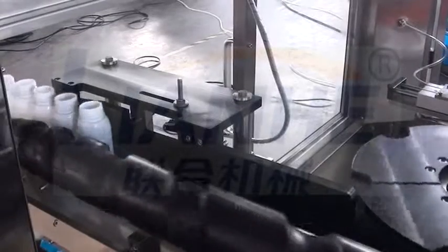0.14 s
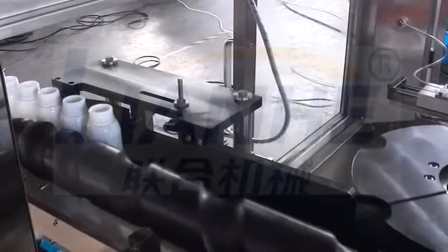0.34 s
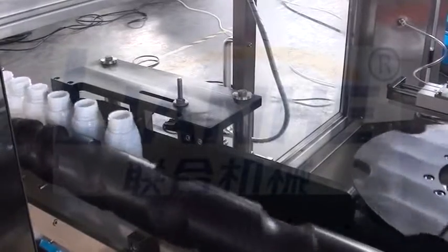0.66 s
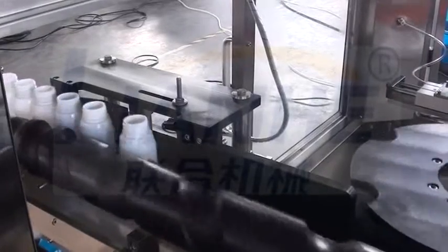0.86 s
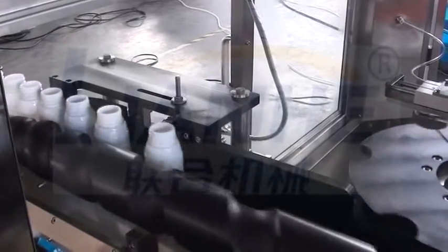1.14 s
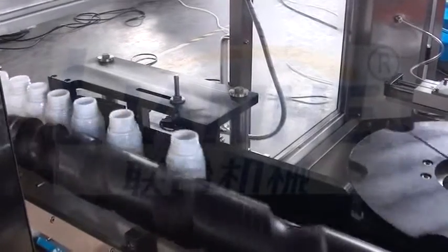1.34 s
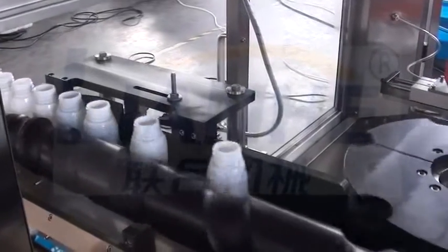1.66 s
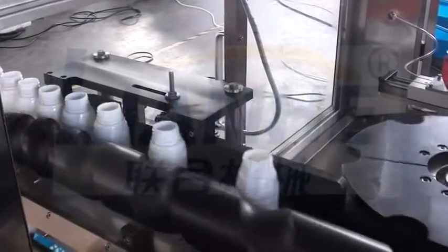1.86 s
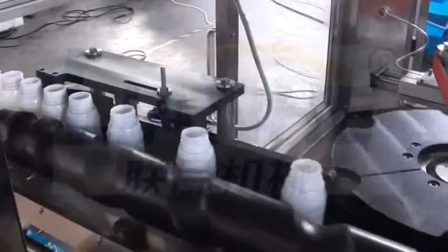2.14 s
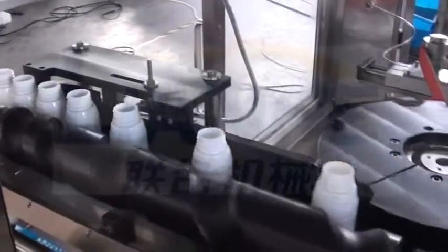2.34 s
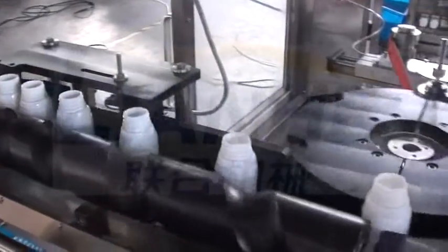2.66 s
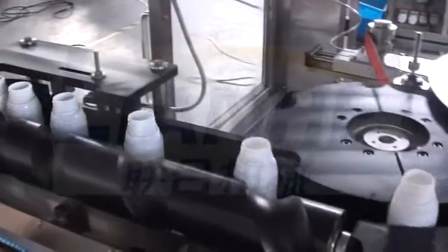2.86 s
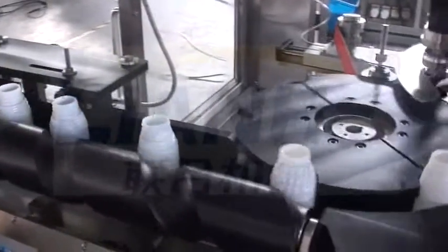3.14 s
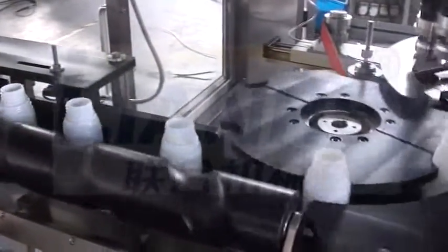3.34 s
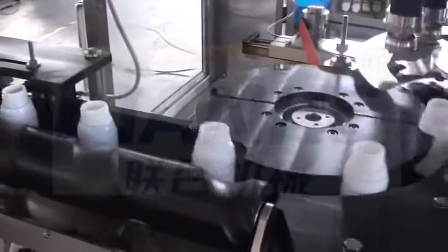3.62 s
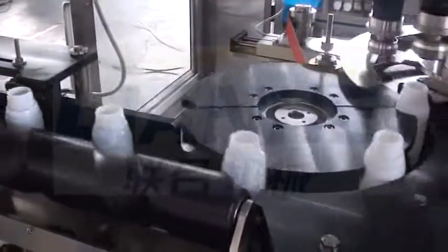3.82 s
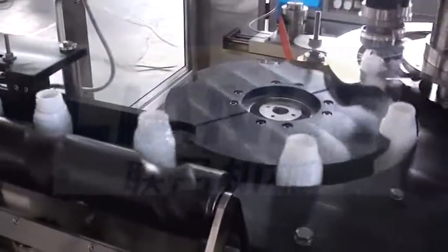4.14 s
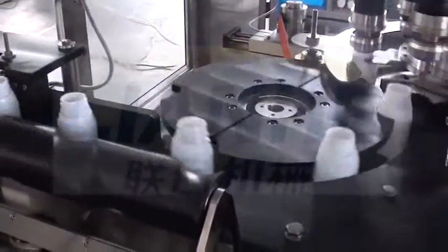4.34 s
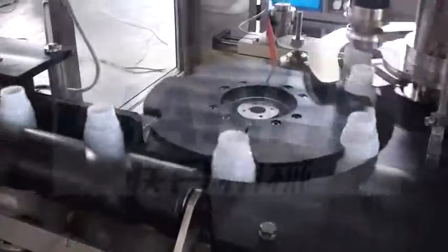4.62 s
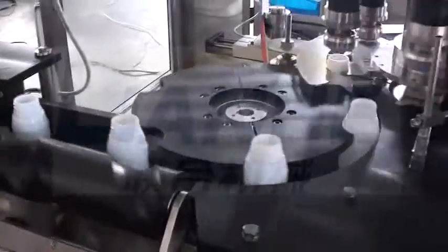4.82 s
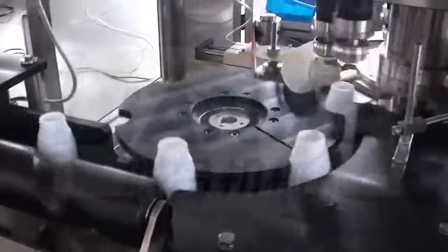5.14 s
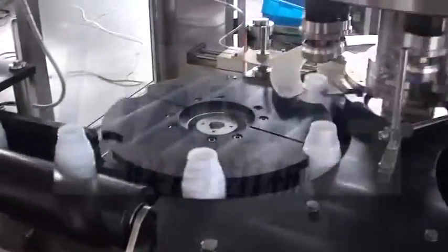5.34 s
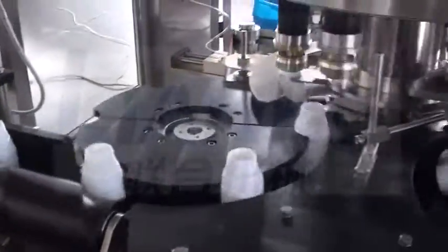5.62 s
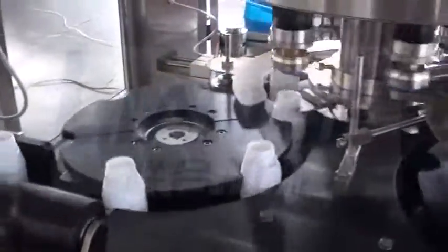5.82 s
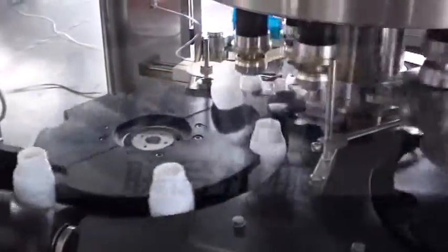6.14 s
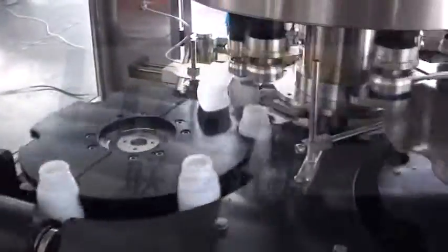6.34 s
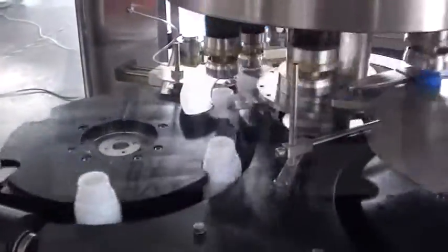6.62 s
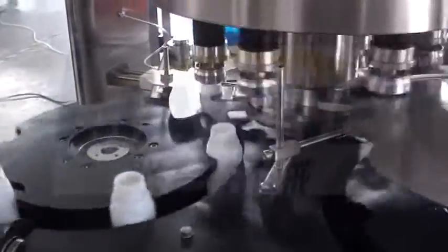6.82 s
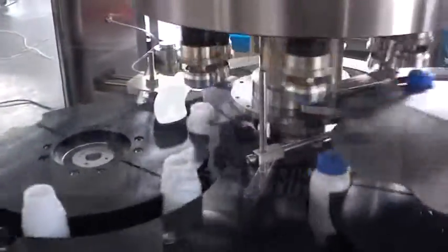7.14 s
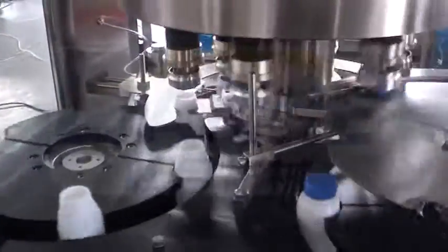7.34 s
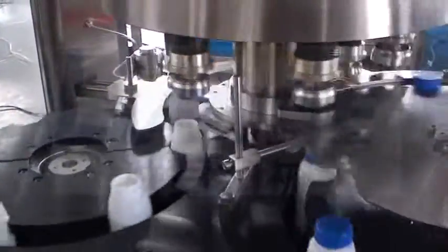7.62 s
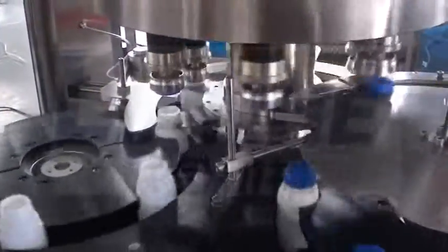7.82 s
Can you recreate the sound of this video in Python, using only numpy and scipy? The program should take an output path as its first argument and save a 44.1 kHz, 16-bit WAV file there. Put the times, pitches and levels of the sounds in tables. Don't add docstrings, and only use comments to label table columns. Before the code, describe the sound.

Rhythmic pneumatic clack-and-psst cycles over a broad machine roar, with ringing bottle ticks, steel snaps and brief rubber squeaks near the end.

```python
import sys
import numpy as np
from scipy import signal
from scipy.fft import rfft, irfft, next_fast_len
from scipy.io import wavfile
from scipy.ndimage import uniform_filter1d, map_coordinates

SR = 44100
rng = np.random.default_rng(int(sys.argv[2]) if len(sys.argv) > 2 else 0)


def to_wav(sig):
    pcm = np.clip(np.atleast_2d(sig), -1, 1) * 32767
    pcm = np.round(pcm).astype(np.int16)
    wavfile.write(sys.argv[1], SR, pcm.T)


def boost(x):
    u = np.asarray(x, float) / 20
    return 10 ** u


N = 351477
TIME = np.arange(N) / SR


def unit(x):
    return x / np.sqrt(np.mean(x ** 2) + 1e-20)


def along(points, hz):
    f, v = np.transpose(points)
    return np.interp(np.log(hz + 1), np.log(f + 1), v)


def wobble(rate):
    return map_coordinates(rng.standard_normal(int(N * rate / SR) + 4), [TIME * rate])


def filtered(x, response):
    m = next_fast_len(N + 8192)
    return irfft(rfft(x, m) * response(np.fft.rfftfreq(m, 1 / SR)), m)[..., :N]


def rush(spectrum, peaks, patchy_db):
    z = signal.stft(rng.standard_normal(N), nperseg=512)[2]
    field = uniform_filter1d(rng.standard_normal(z.shape), size=2, axis=0)
    field = uniform_filter1d(field, size=10, axis=1)
    x = signal.istft(z * boost(patchy_db * unit(field)), nperseg=512)[1][:N]

    def response(hz):
        bumps = sum(db / (1 + (2 * (hz - center) / width) ** 2) for center, width, db in peaks)
        return boost(along(spectrum, hz) + bumps)

    return unit(filtered(x, response))


def burst(start, rise, hold, fade_db):
    t = TIME - start
    return np.clip(t / rise, 0, 1) * boost(-fade_db * np.clip(t - hold, 0, 1))


# (frequency [Hz], t60 [s])
HALL_T60 = [(200, 0.83), (2000, 0.94), (8000, 0.043)]


def hall(x):
    hz, t, z = signal.stft(rng.standard_normal(SR // 2), SR, nperseg=256)
    decay = boost(-60 * t / along(HALL_T60, hz)[:, None])
    tail = signal.istft(z * decay, SR, nperseg=256)[1]
    return signal.fftconvolve(x, tail / np.linalg.norm(tail))[:N]


# (time [s], level [dB])
ROAR_LEVEL = [(0, -29), (2.6, -29.5), (3.4, -28), (3.9, -29.3), (4.2, -27.5), (4.5, -28), (5.8, -29),
              (6.0, -27.5), (7.97, -27)]
# (frequency [Hz], density [dB per Hz])
ROAR_SPECTRUM = [(15, -65), (25, -38.5), (74, -15), (119, -8), (152, -10), (228, -9.5), (416, -8),
                 (469, -11), (626, -7), (740, -7), (1040, -8.5), (1680, -11), (3700, -15), (5850, -23),
                 (7800, -24.5), (10100, -49), (17200, -120)]
# (frequency [Hz], width [Hz], height over the roar [dB])
FRAME_MODES = [(165, 25, 6), (315, 160, 4), (618, 49, 5.5), (1002, 80, 2.5), (4330, 1000, 3),
               (5030, 780, -1), (6000, 900, 2)]
# (time [s], level [dB])
CHUCK_LEAK = [(0, -27.5), (.3, -37), (1.4, -34), (2.2, -36.5), (4.2, -35), (6.2, -31.5), (6.7, -37.5),
              (7.05, -27), (7.97, -23)]
# (frequency [Hz], density [dB per Hz])
LEAK_SPECTRUM = [(3000, -22), (4800, -6.5), (6000, -4.5), (7000, 0.5), (9000, -8.5), (14000, -10.5)]
# (frequency [Hz], level [dB])
MOTOR_HUM = [(150.7, -41), (640.6, -49.5)]


def machine():
    roar_db = np.interp(TIME, *np.transpose(ROAR_LEVEL)) + 1.5 + 1.0 * wobble(12)
    roar = boost(roar_db) * rush(ROAR_SPECTRUM, FRAME_MODES, patchy_db=1.26)
    leak_db = np.interp(TIME, *np.transpose(CHUCK_LEAK)) + .8 * wobble(20)
    leak = boost(leak_db) * rush(LEAK_SPECTRUM, [], patchy_db=.9)
    hum = np.zeros(N)
    for hz, db in MOTOR_HUM:
        phase = 2 * np.pi * np.cumsum(hz + 2.836 * wobble(12)) / SR
        hum += boost(db + 2 + 2.5 * wobble(8.3)) * np.sin(phase)
    return roar + leak + hum


# (time [s], peak [dB], open time [s], body [dB])
FAR_VENTS = [(0.0394, -36.5, 0.06, -16), (3.218, -22.5, 0.049, -1), (4.0741, -14.5, 0.09, -1.5),
             (5.819, -20.5, 0.03, -1.5), (6.419, -20, 0.039, -10.5), (6.6846, -10.5, 0.017, -7.5),
             (6.9294, -20.5, 0.043, -5), (7.5572, -20, 0.042, -4.5)]
# (time [s], length [s], frequency [Hz], level [dB])
EDGE_WHISTLES = [(.595, .045, 4450, -30), (4.12, .09, 2306, -35.5), (4.135, .05, 1930, -37),
                 (4.14, .04, 3050, -35), (6.695, .04, 2650, -35), (6.92, .15, 2306, -35.5),
                 (6.93, .12, 1566, -38), (6.93, .1, 3154, -39)]
VENT_FADE_DB_PER_S = 111.5


def air():
    far = [boost(db - 9) * burst(s, .01, hold, VENT_FADE_DB_PER_S) for s, db, hold, _ in FAR_VENTS]
    body = sum(flow * boost(row[3]) for flow, row in zip(far, FAR_VENTS))
    body_spectrum = [(800, -15), (1600, 1.5), (2300, -1.5), (3200, 3), (4500, -4.5), (7000, -15.5)]
    out = sum(far) * rush(LEAK_SPECTRUM, [], patchy_db=0.5)
    out = out + body * rush(body_spectrum, [], patchy_db=1.2)
    for s, span, hz, db in EDGE_WHISTLES:
        hoarse = 0.9 + 0.44 * wobble(90)
        out += boost(db + 5.0) * burst(s, 0.0092, span, 400) * hoarse * np.sin(2 * np.pi * hz * TIME)
    return out


# (time [s], length [s], first frequency [Hz], last frequency [Hz], peak [dB])
CHUCK_SQUEAKS = [(7.276, .017, 6720, 6660, -16), (7.35, .052, 5420, 5780, -16.5),
                 (7.608, .108, 5580, 5340, -21), (7.707, .066, 6780, 7130, -6.5)]
GRIP_LOSS = [10, 10, 4, 19]
GRIP_POWER = 2


def squeaks():
    out = np.zeros(N)
    for (s, span, first_hz, last_hz, db), ends_db in zip(CHUCK_SQUEAKS, GRIP_LOSS):
        u = np.clip((TIME - s) / span, 0, 1)
        glide_hz = first_hz + (last_hz - first_hz) * u
        turns = 2 * np.pi * np.cumsum(glide_hz * (1 + .014 * wobble(300))) / SR
        gate = np.clip(np.minimum(u, 1 - u) * span / 0.0041, 0, 1)
        slip = (.55 + .8 * wobble(260)) * np.sin(turns)
        slip += .8 * wobble(260) * np.cos(turns)
        slip += .6 * np.sin(2 * turns)
        out += gate * boost(db - 0.5 - ends_db * np.abs(2 * u - 1) ** GRIP_POWER) * slip
    return out


def ticks(rows, spread, chatter, count):
    out, t = np.zeros(N + SR), np.arange(SR // 5) / SR
    for (s, db, hz, t60), chance in zip(rows, rng.random((len(rows), count, 3))):
        place = (np.arange(count) + chance[:, 0]) / count - .5
        modes = hz * np.exp(spread * 3.4 * place)
        ring = boost(6 * chance[:, 1]) @ np.sin(2 * np.pi * (modes[:, None] * t + chance[:, 2:]))
        decay = boost(-60 * np.clip(t - chatter, 0, 1) / t60)
        shape = decay * (1 - np.exp(-t / 0.00026))
        out[round(s * SR):][:len(t)] += boost(db - 11.5) * unit(ring) * shape
    return out[:N]


# (time [s], peak [dB], ring [Hz], t60 [s])
PLASTIC_PINGS = [(.1062, -13, 6240, 0.044), (.106, -21, 2820, .08), (.4047, -24, 1830, .08),
                 (1.029, -14, 3860, 0.12), (1.0808, -7.5, 4040, .067), (1.6693, -7, 4180, 0.033),
                 (1.672, -15.5, 2960, .09), (2.016, -20, 2570, 0.064), (2.0573, -14, 4200, 0.044),
                 (2.3662, -15.5, 3630, 0.087), (2.527, -16, 2380, 0.037), (2.527, -14, 3380, 0.035),
                 (3.021, -12, 3490, .035), (4.01, -24, 1700, .08), (4.639, -13.5, 1930, 0.23),
                 (4.864, -10.5, 4020, .09), (4.9694, -20, 3020, 0.062), (5.456, -10.5, 4100, .057),
                 (6.1484, -28, 1620, .091), (6.8334, -15, 1780, .08), (6.93, -9, 3140, .1),
                 (7.471, -14, 3050, .096)]


def plastic_pings():
    return ticks(PLASTIC_PINGS, spread=.039, chatter=.0065, count=12)


# (time [s], peak [dB], ring [Hz], t60 [s])
STEEL_SNAPS = [(.1062, -16, 4740, .055), (1.0819, -14, 3930, .08), (1.1682, -15, 4470, .053),
               (1.2694, -9, 3050, 0.11), (1.6227, -13, 6000, .049), (2.367, -16, 3510, .092),
               (2.4244, -21, 3000, .06), (2.5274, -9, 4330, .04), (2.9163, -17.5, 3130, .052),
               (3.021, -11.5, 3450, .029), (3.222, -18, 5800, 0.14), (3.7894, -16, 4500, .06),
               (4.5565, -7.5, 5600, 0.058), (4.8638, -14, 4080, 0.066), (5.2849, -7.5, 6000, 0.022),
               (5.4056, -24, 3330, .053), (5.456, -9, 4120, 0.024), (5.8187, -7, 6150, 0.06),
               (6.3634, -8, 3630, 0.023), (7.0818, -4.5, 5820, 0.031), (7.5694, -8, 4330, .041),
               (7.7894, -18, 4400, 0.074)]


def steel_snaps():
    return ticks(STEEL_SNAPS, spread=.29, chatter=0.0044, count=30)


# (time [s], peak [dB], crack [dB], jangle [dB], table thump [dB])
PISTON_SLAMS = [(0.027, -11.5, -2, -11.5, -43), (0.536, -7, 7.5, -9.5, -10), (1.167, -6, -2.5, -10, -21),
                (1.795, -6, -4, -12, -18.5), (2.422, -11.5, -2, -3, -15), (3.048, -8.5, -8.5, -15, -17),
                (3.681, -8.5, 6.5, -6, -26), (4.312, -7.5, -3, -17, -21), (4.951, -9.5, -1.5, -2.5, -20),
                (5.586, -7.5, 7, -15.5, -15), (6.211, -12.5, 5, -4, -13.5), (6.831, -10.5, -10, -11, -37),
                (7.467, -8.5, -9, -7, -18)]
# (frequency [Hz], density [dB])
SLAM_SPECTRUM = [(40, -28.5), (120, -8), (300, 4.5), (700, -3), (1800, -5), (3500, -6.5), (7000, -13.5),
                 (12000, -31)]
CLAP_T60_S = .1
THUMP_LAG_S, THUMP_S = .014, .03


def slams():
    crack = sum(boost(db - 15 + sharp) * burst(s, 0.0006, 0.001, 60 / 0.009)
                for s, db, sharp, _, _ in PISTON_SLAMS)
    claps = [boost(db - 15.5) * burst(s, .003, 0.027, 60 / CLAP_T60_S) for s, db, *_ in PISTON_SLAMS]
    jangle = sum(clap * boost(row[3] + 7) for clap, row in zip(claps, PISTON_SLAMS))
    thump = sum(boost(db - 12.0) * burst(s + THUMP_LAG_S, 0.024, THUMP_S, 450)
                for s, *_, db in PISTON_SLAMS)
    rattle = boost(0.77 * wobble(250))
    table = [(30, -26.5), (100, 2.5), (300, -7), (900, -10.0), (2000, -17.0), (4000, -68.0)]
    steel = [(1500, -33.0), (2800, -3.0), (4000, -4.5), (5500, -6.5), (7500, -4.0), (10000, -19.0)]
    blow = (crack + sum(claps) * rattle) * rush(SLAM_SPECTRUM, [(1780, 140, 5.3)], patchy_db=3.2)
    jangling = jangle * rattle * rush(steel, [], patchy_db=3)
    return blow + jangling + thump * rush(table, FRAME_MODES, patchy_db=-1.0)


# (time [s], peak [dB], open time [s], shrill top [dB])
VALVE_JETS = [(0.0, -12, 0.021, -4.5), (0.5877, -11, 0.075, -1.5), (1.223, -9.5, 0.048, 0.5),
              (1.861, -11.5, 0.1, -4), (2.4803, -8.5, 0.068, -2.5), (3.0924, -11, 0.11, -4),
              (3.7255, -9.5, 0.062, -7), (4.356, -12, 0.075, -3), (5.0025, -8, 0.06, -2),
              (5.6467, -10.5, 0.093, -2.5), (6.263, -5.5, 0.046, -4), (6.884, -9.5, 0.085, -6.5),
              (7.498, -11.5, 0.099, -4)]
# (frequency [Hz], density [dB per Hz])
JET_SPECTRUM = [(1500, -27), (3000, -9.5), (4400, -3.5), (5200, -5), (6500, 3), (7300, -2.5), (9000, -3),
                (12000, -26.5)]
# (frequency [Hz], width [Hz], height [dB])
NOZZLE_MODES = [(4400, 250, 1.5), (6560, 180, -4), (7320, 530, 6.5)]
JET_FADE_DB_PER_S = 173


def jets():
    flows = []
    for s, db, span, _ in VALVE_JETS:
        shut = boost(-300 * np.clip(TIME - (s + span), 0, 1))
        flows.append(boost(db - 2.0) * burst(s - .008, 0.022, 0.41 * span, JET_FADE_DB_PER_S) * shut)
    top = sum(flow * boost(row[3]) for flow, row in zip(flows, VALVE_JETS))
    flutter = boost(.7 * wobble(90))
    shrill = [(8500, -85), (9500, 5), (15000, -29.0), (18000, -65.5)]
    blast = sum(flows) * flutter * rush(JET_SPECTRUM, NOZZLE_MODES, patchy_db=1.5)
    return blast + top * rush(shrill, [], patchy_db=0.0)


def scene():
    near = slams() + plastic_pings() + steel_snaps()
    blast = jets()
    echo = boost(-15) * hall(near + .5 * blast)
    return np.tile(near + echo + squeaks() + blast + air() + machine(), (2, 1))


def roll_off(x):
    return signal.sosfilt(signal.butter(12, 8980, fs=SR, output="sos"), x)


def record(dry):
    heard = filtered(dry[0], lambda hz: np.sqrt(0.082 + (hz / 6000) ** 2))
    power = np.abs(uniform_filter1d(heard ** 2, round(.006 * SR)))
    gain = (1 + (power / boost(2 * -15.5)) ** 2) ** -.24
    gain = uniform_filter1d(gain, round(.005 * SR))
    band_edge = [(7730, 0), (7800, -40.0), (8000, -35.0), (8250, -46.5), (8800, -91.0)]
    mix = filtered(dry * gain, lambda hz: boost(along(band_edge, hz)))
    return roll_off(mix)


dry = scene()
out = record(dry)
to_wav(out)
```